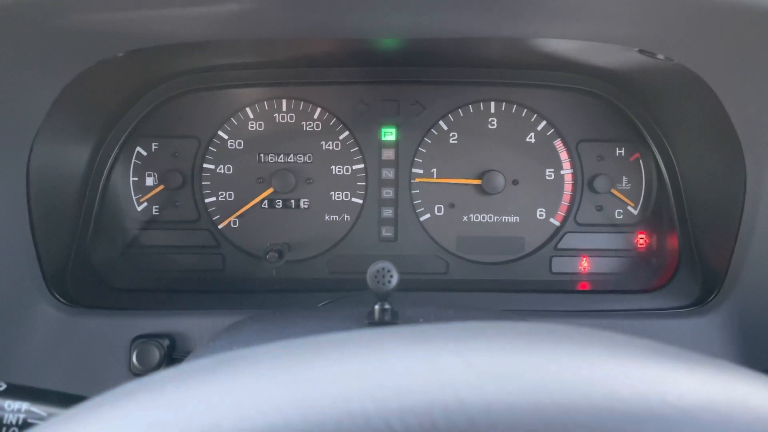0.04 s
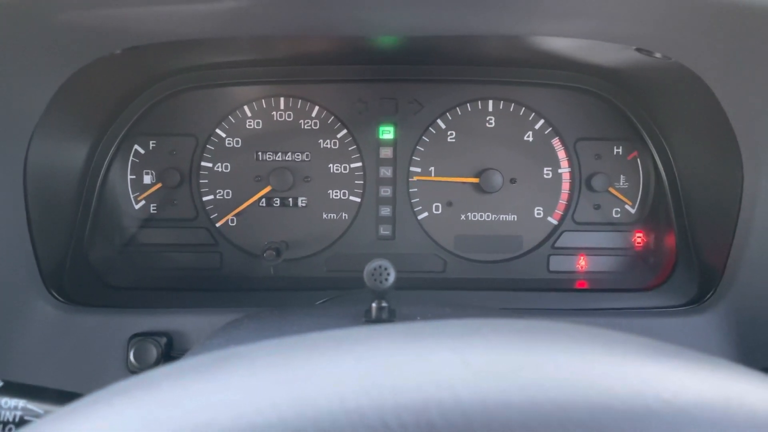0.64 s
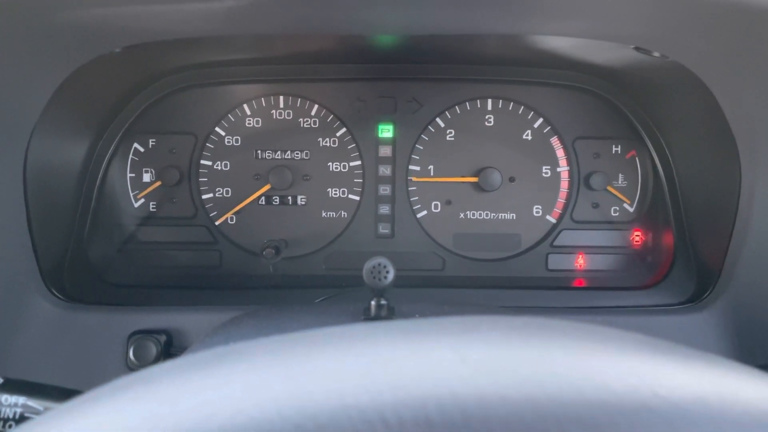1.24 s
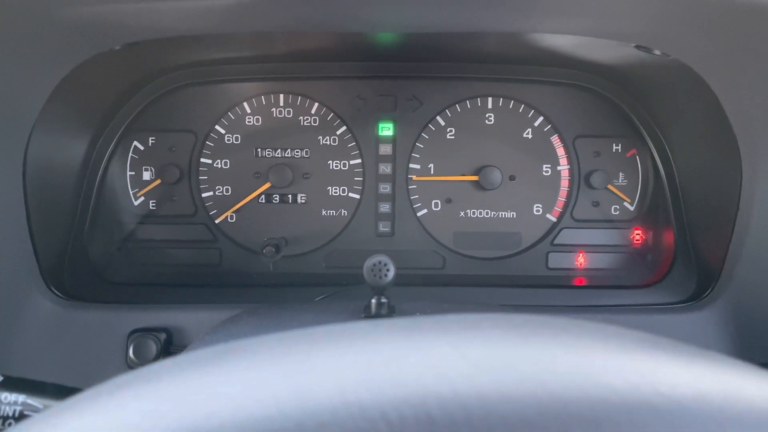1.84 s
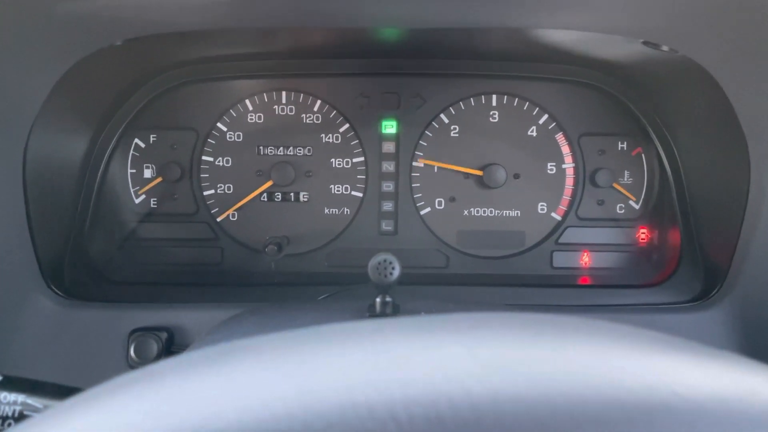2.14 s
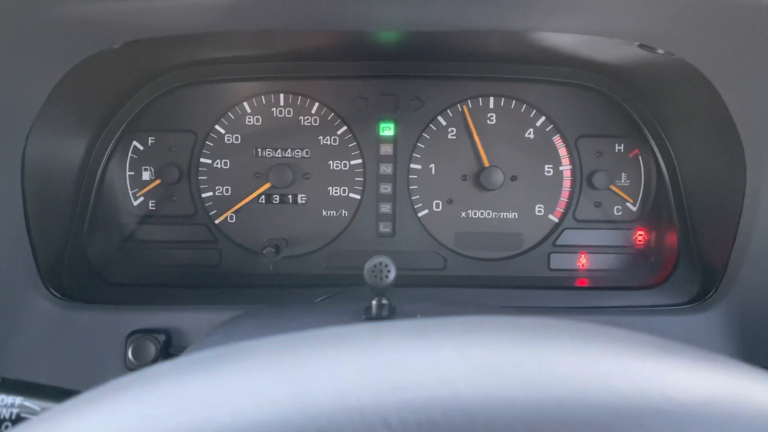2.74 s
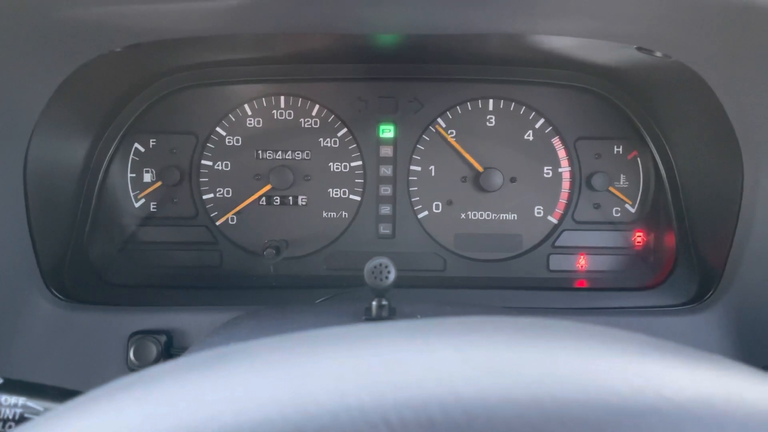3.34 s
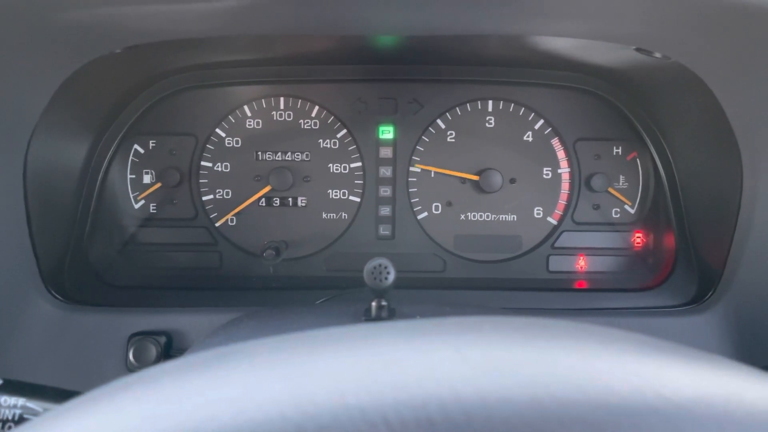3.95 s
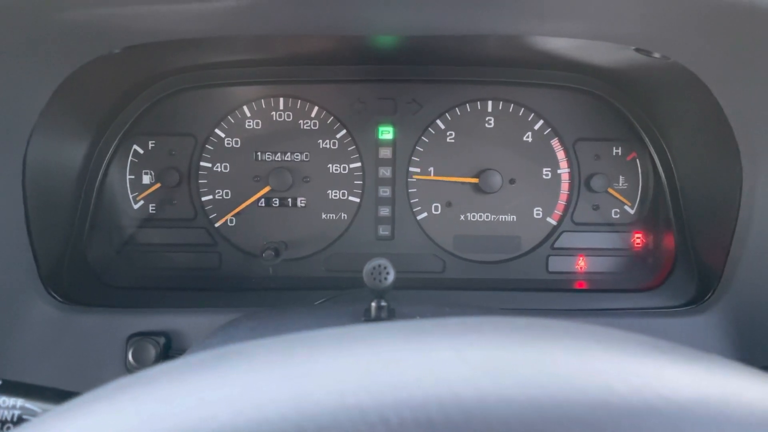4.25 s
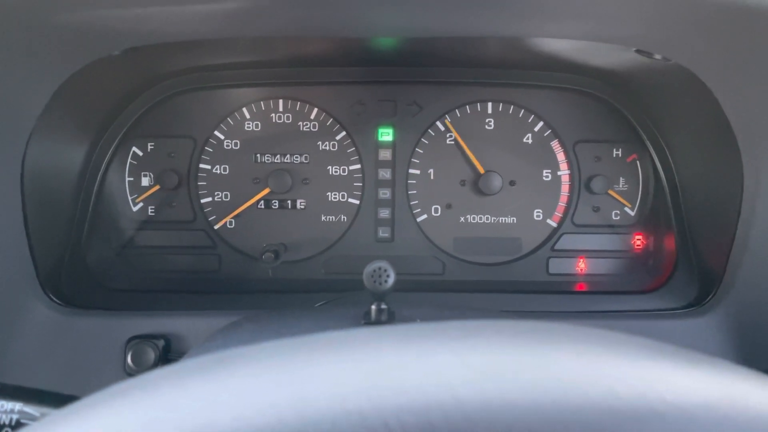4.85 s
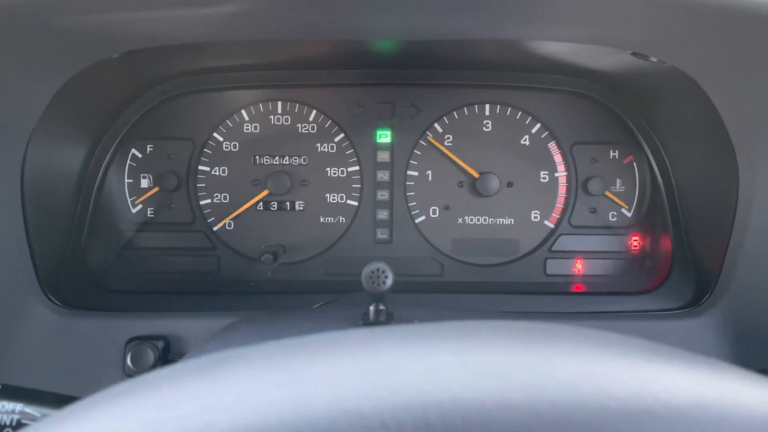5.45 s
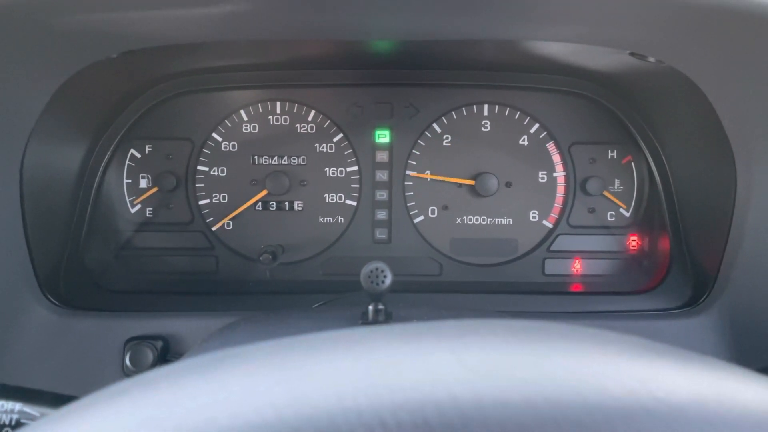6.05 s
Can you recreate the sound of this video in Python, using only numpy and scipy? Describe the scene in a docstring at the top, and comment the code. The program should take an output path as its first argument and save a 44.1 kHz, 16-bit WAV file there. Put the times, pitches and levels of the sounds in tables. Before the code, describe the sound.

A four-cylinder diesel engine idles with a low throb and light clatter, heard from the driver's seat of a stationary vehicle. After a slight nudge of the accelerator, it is revved twice, each time swelling into a booming, knocking roar and sinking back toward idle. A faint, airy turbo whistle climbs high and coasts down with each rev. Loose dashboard trim buzzes briefly now and then.

```python
"""Turbo diesel from the driver's seat

A four-cylinder engine, heard on a stereo microphone in the cabin, idles near 720 rpm, is nudged once,
then revved twice. Each firing pushes the cabin air (boom), shakes the body (roar), knocks the block
and makes the valves and injectors tick. The turbocharger whistles up under throttle and coasts slowly
down. The engine knocks hard as it pulls, and loose trim buzzes now and then."""
import sys
import numpy as np
from scipy import signal
from scipy.fft import rfft, irfft, next_fast_len
from scipy.io import wavfile

SR = 44100
rng = np.random.default_rng(int(sys.argv[2]) if len(sys.argv) > 2 else 0)


def materialize(psi):
    """Save the field psi as 16-bit PCM at rate SR to the path in sys.argv[1].

    A 1-D psi becomes a single channel; in a 2-D psi each row is a channel.
    """
    bounded = np.clip(np.atleast_2d(psi).T, -1, 1)
    quanta = np.round(bounded * 32767).astype(np.int16)
    wavfile.write(sys.argv[1], SR, quanta)


N = 272979
TIME = np.arange(N) / SR
FFT_SIZE = next_fast_len(N + SR // 4)
FREQ = np.maximum(np.arange(FFT_SIZE // 2 + 1) * SR / FFT_SIZE, 1)


# The firing pulse. Each row: multiple of the firing rate, level at idle in dB,
# dB more per doubling of speed, share of the pedal's extra boom.
PULSE_ORDERS = [(1, 0.5, 0.5, 1.2), (2, -8.5, 3.2, 0.57), (3, -15, 6.5, 1.07), (4, -7, -3.5, 0.7),
                (5, -22, 10.5, .3)]
# How the cabin air answers at the seat. Each row: frequency in Hz, gain in dB coasting, at full load.
CABIN_RESPONSE = [(24, -94, -48), (31, -51, -29), (39.5, -34, -22.5), (48.5, -22.5, -17.5),
                  (57.3, -14.5, -12), (67.9, -22, -11.5), (75.2, -13.5, -13.5), (82.8, -20.5, -16.5),
                  (94.5, -30, -18.5), (111, -26.5, -26.5), (159.6, -33.5, -36), (175.4, -29, -20.5),
                  (187, -27, -25), (203, -28, -35.5), (255, -38, -48)]
# Tones of crank, cam and belt drive. Each row: multiple of the firing rate, level at idle in dB,
# dB more per doubling of speed.
DRIVE_ORDERS = [(.75, -71.5, 23), (6, -45.5, -0.5), (7, -47.5, -5), (7.5, -59, 3.5), (8, -54, -0.5),
                (9, -55, -1), (9.75, -68, 6), (10, -55.5, -1.5), (13, -58, -5), (14, -65, -1), (16, -64, 0)]

def boom(cycles, firing_hz, octaves, load, swell_db):
    """Firing orders sweep through the cabin's resonances: a throb at idle, a hum at speed."""
    stroke_db = 0.55 * drift(11)  # no two power strokes push equally hard
    hz, *responses = np.transpose(CABIN_RESPONSE)
    hum = 0
    for order, idle_db, rise_db, share in PULSE_ORDERS:
        order_hz = order * firing_hz
        coasting_db, pulling_db = (np.interp(np.log(order_hz), np.log(hz), db) for db in responses)
        cabin_db = coasting_db + load * (pulling_db - coasting_db)
        dip_db = -10 * (1 - load) * bell(order_hz, centre_hz=51.8, width_hz=3.5)  # a brief dropout
        level_db = idle_db + rise_db * octaves + cabin_db + dip_db + share * swell_db + stroke_db
        # the cabin delays the orders unequally, so the thumps run together
        delay_rad = .6 + (order - 1) * 1.29 * octaves + .62 * (order - 3) ** 2
        hum += from_db(level_db) * np.cos(2 * np.pi * order * cycles - delay_rad)
    waver_db = np.interp(octaves, [0, 1], [.8, 4])  # the drive tones waver more at speed
    for order, idle_db, rise_db in DRIVE_ORDERS:
        offset_rad = max(order - 4, 0) * 2 * np.pi * rng.random() - .6
        level_db = idle_db + rise_db * octaves + waver_db * drift(14)
        hum += from_db(level_db) * np.cos(2 * np.pi * order * cycles + offset_rad)
    return np.sqrt(2) * hum * from_db([[.25], [-.35]])  # a touch louder on the left


# Three paths from the cylinders to the seat. Each row: frequency in Hz, relative level in dB.
ROAR_SPECTRUM = [(25, -29), (45, -5), (70, 8), (100, 5.5), (140, -1), (180, -2), (230, -6), (290, -8.5),
                 (430, -22.5), (900, -65.5)]
GROWL_SPECTRUM = [(180, -16.5), (250, 13.5), (310, 9), (380, 3), (450, 5.5), (560, 2), (800, -1),
                  (1300, -53)]
BLOCK_SPECTRUM = [(200, -27), (380, -0.5), (490, 1.5), (590, -2), (700, 1), (820, 1.5), (890, -5),
                  (1030, -10), (1130, -14.5), (1800, -65)]

def combustion(cycles, knocks, firing_hz, octaves, load):
    """Combustion roars through the body, growls at speed and knocks in the block."""
    blows = firings(cycles)
    roar = struck_part(blows, firing_hz, ROAR_SPECTRUM, rise_s=.013, decay_s=.04, repeat=.12, steady=1)
    growl = struck_part(blows, firing_hz, GROWL_SPECTRUM,
                        rise_s=.004, decay_s=.018, repeat=.2, steady=.3)
    repeat = np.interp(octaves, [0, 1], [.42, .2])  # the knock loosens at speed
    knock = struck_part(knocks, firing_hz, BLOCK_SPECTRUM,
                        rise_s=.012, decay_s=.032, repeat=repeat, steady=.084)
    every_fourth = firings(cycles / 4, early=.5425, scatter_db=2)  # one cylinder knocks harder
    odd_knock = cabin(sprays(every_fourth, firing_hz, rise_s=.00029, decay_s=.0037), BLOCK_SPECTRUM)
    mix = (from_db(-1.5 + 1.22 * octaves) * roar
           + from_db(-26.5 + 12.26 * octaves - 3.7 * load) * growl
           + from_db(-9 - .25 * octaves - 1.25 * load) * knock
           + from_db(-21 - 4.8 * octaves) * odd_knock)
    return from_db(-35.5 + 4 * octaves + .5 * octaves ** 2 + 4 * load) * mix


# The top of the engine, from behind the dashboard. Each row: frequency in Hz, relative level in dB.
CLATTER_SPECTRUM = [(600, -71.5), (1000, -7), (1200, 1), (1500, 5.5), (2150, -2), (2700, -5), (3200, -9),
                    (3700, -25), (6000, -37)]
TICK_SPECTRUM = [(2000, -8.5), (3300, 8), (4200, 6), (5200, 5), (6000, 2), (7500, -8), (9000, -2),
                 (10300, 3), (12000, -2.5), (13500, -10), (15500, -5.5)]
INJECTOR_SPECTRUM = [(3000, -14), (6000, -8), (8000, -8.5), (10300, 7.5), (12500, -5.5), (15500, 0)]

def valves_and_injectors(cycles, knocks, firing_hz, octaves, load):
    """Valves clatter and tick louder with speed and load; the injectors' fine tick holds its level."""
    taps = firings(cycles)
    clatter = struck_part(knocks, firing_hz, CLATTER_SPECTRUM,
                          rise_s=.008, decay_s=.023, repeat=.28, steady=.52)
    ticking = struck_part(taps, firing_hz, TICK_SPECTRUM,
                          rise_s=.013, decay_s=.021, repeat=.41, steady=.34)
    injectors = cabin(sprays(taps, firing_hz, rise_s=.003, decay_s=.009), INJECTOR_SPECTRUM)
    return (from_db(-53.5 + 4 * octaves + 2 * octaves ** 2 + 2.5 * load) * clatter
            + from_db(-65 + 1.46 * octaves + 3.5 * octaves ** 2 + 4 * load) * ticking
            + from_db(-70) * injectors)


# The bright crack of injection knock. Each row: frequency in Hz, relative level in dB.
CRACK_SPECTRUM = [(700, -30), (1200, -32), (1600, 9), (2200, 7.5), (2700, 2), (4300, -17.5), (7000, -18.5),
                  (12000, -50)]

def injection_rattle(cycles, firing_hz, throttle):
    """Near full speed under throttle, injection knock turns into sharp, uneven cracks, one a firing."""
    onset = np.clip((firing_hz - 67.7) / 5.8, 0, 1)
    clicks = firings(cycles, early=.37, scatter_db=4)
    cracks = sprays(clicks, firing_hz, rise_s=.0003, decay_s=.0035)
    return from_db(-45.5) * onset * throttle * cabin(cracks, CRACK_SPECTRUM)


# Firings that knock hard as the engine pulls. Each row: start in seconds, clonk in dB, crack in dB.
HARSH_FIRINGS = [(2.203, -23, -41), (2.287, -40, -43), (2.341, -37, -49), (2.413, -25, -41),
                 (2.482, -32, -31), (2.531, -27, -44), (2.539, -34, -38), (2.612, -23, -38),
                 (4.301, -31, -42), (4.322, -31, -48), (4.35, -27.5, -46), (4.503, -31, -39),
                 (4.673, -41, -40)]

def hard_knocks():
    """Single harsh firings: a clonk in the block and a bright crack from the covers."""
    starts, clonk_db, crack_db = np.transpose(HARSH_FIRINGS)
    clonk = jolts(zip(starts, clonk_db), rise_s=.00046, decay_s=.0041) * cabin_noise(BLOCK_SPECTRUM)
    crack = jolts(zip(starts, crack_db), rise_s=.00059, decay_s=.004) * cabin_noise(CRACK_SPECTRUM)
    return clonk + crack


# The turbo shaft's speed, up ahead in the engine bay. Each row: time in seconds, whistle pitch in Hz.
TURBO_PITCH = [(0, 4430), (.55, 3780), (1.9, 3200), (2.14, 4400), (2.27, 5950), (2.35, 6900), (2.46, 9400),
               (2.59, 11350), (2.66, 11300), (2.8, 10400), (3.03, 8700), (3.33, 7150), (3.6, 5850),
               (4.15, 4350), (4.29, 4800), (4.4, 5400), (4.46, 6050), (4.52, 6400), (4.57, 7150),
               (4.66, 8650), (4.72, 9950), (4.76, 10400), (5.02, 8750), (5.35, 7150), (5.7, 5600),
               (6.19, 4450)]
# Broad intake resonances, where the whistle flares or fades. Each row: centre in Hz, width in Hz,
# lift in dB off the throttle, lift in dB at full throttle.
INTAKE_RESONANCES = [(4050, 500, 3.5, 0), (4650, 600, 0, 8.5), (5400, 600, 0, -3), (6300, 750, -1.5, 9),
                     (7200, 800, -2.5, 0), (8100, 860, 1, 3), (10050, 1300, 4, 15), (11200, 1100, 9, 4.5)]
# Air rushing into the intake while the pedal is down. Each row: frequency in Hz, relative level in dB.
INTAKE_SPECTRUM = [(2000, -38), (4000, -9.5), (6300, 4), (8000, -19), (10000, 7), (13000, 4), (15000, 3.5)]
# Narrow duct modes that sing as the whistle passes. Each row: centre in Hz, width in Hz, lift in dB.
DUCT_MODES = [(6600, 90, 7.5), (6200, 65, 2), (9500, 59, 7), (9670, 170, 6), (9600, 98, 2.5)]

def turbo(throttle):
    """Exhaust spins the shaft up and it coasts down, whistling in patches over the intake's rush."""
    hz, = in_time(TURBO_PITCH)
    octaves = np.log2(hz / 4400)
    level_db = -75 + 5.5 * octaves + 7 * throttle
    level_db -= .04 * np.maximum(3780 - hz, 0)  # the whistle dies away at low pitch
    for centre, width, off_db, on_db in INTAKE_RESONANCES:
        level_db += (off_db + throttle * (on_db - off_db)) * bell(hz, centre, width)
    breath = np.clip(.3 + 1.5 * octaves, .1, .85)
    tone = np.sqrt(1 - breath) * whistle(hz, width_hz=110) + np.sqrt(breath) * whistle(hz, width_hz=420)
    flutter_db = 2.2 * drift(40)
    rush = from_db(-60) * throttle * cabin_noise(INTAKE_SPECTRUM)
    duct_db = sum(lift_db * bell(FREQ, centre, width) for centre, width, lift_db in DUCT_MODES)
    return filtered(from_db(level_db + flutter_db) * tone + rush, from_db(duct_db))


def whistle(hz, width_hz):
    """An airy tone: turbulence smears it into a narrow band."""
    phase = 2 * np.pi * np.cumsum(hz) / SR
    pair = [drift(width_hz) * np.cos(phase) + drift(width_hz) * np.sin(phase) for _ in range(2)]
    return cabin(np.array(pair), [(3000, .003), (12000, .013)])  # an all but flat path


# Loose trim, close to the microphone. Each row: start in seconds, level in dB.
TRIM_BUMPS = [(.637, -32), (.652, -36), (2.8348, -28), (4.626, -39), (4.715, -25)]
# Its dull buzz. Each row: frequency in Hz, relative level in dB.
TRIM_SPECTRUM = [(150, -12), (350, 4), (800, 0), (2300, -13), (4000, -29), (12000, -48)]

def dashboard_trim():
    """Loose trim in the dashboard bumps and buzzes briefly."""
    return jolts(TRIM_BUMPS, rise_s=.0015, decay_s=.0064) * cabin_noise(TRIM_SPECTRUM)


# Ringing panels and engine covers. Each row: centre in Hz, width in Hz, lift in dB.
PANEL_MODES = [(204, 16, 4), (348, 110, 4.5), (647, 18, 8.5), (1029, 25.4, 11), (1430, 33, 6.5),
               (2152, 29, 8.5), (3340, 40, 8), (4310, 400, 3), (6000, 71, 0), (7100, 1100, 9),
               (10450, 110, -6)]
# The microphone's two ports at the driver's seat. Each row: frequency in Hz, likeness from 0 to 1,
# phase lead of the right in radians, left minus right in dB.
MIC_PORTS = [(60, .99, 0, .6), (130, .94, 0, -1.6), (280, .74, -.1, -2), (550, .42, .4, 1.2),
             (850, .47, 1.0, -1), (1250, .48, 2.1, -2), (1800, .42, 1.6, 0), (2200, .28, 0, .7),
             (2900, .48, -1.9, 1.3), (3700, .54, -.3, 2), (5300, .54, -.3, 1.8), (6900, .62, 1.2, .3),
             (7600, .92, 2.7, 0), (8200, .98, 3.1, 0), (9000, .92, 3.6, 0), (10400, .85, 5.5, 0),
             (12400, .9, 6.5, 0), (14000, .96, 9.3, 0), (16000, .98, 9.4, 0)]

def cabin(pair, spectrum):
    """Colour two unrelated signals by a path and the panels, and share them between the ports; rms 1."""
    panel_db = sum(lift_db * bell(FREQ, centre, width) for centre, width, lift_db in PANEL_MODES)
    path_db, = in_frequency(spectrum)
    common, apart = rfft(pair, FFT_SIZE) * from_db(path_db + panel_db)
    alike, lead_rad, pan_db = in_frequency(MIC_PORTS)
    sides = np.array([[1], [-1]])
    ports = np.sqrt(1 + alike) * common + sides * np.sqrt(1 - alike) * apart
    placement = np.exp(-.5j * sides * lead_rad) * from_db(sides * pan_db / 2)
    return rms_one(irfft(ports * placement, FFT_SIZE)[:, :N])


def cabin_noise(spectrum):
    """Steady noise as it reaches the seat along one path."""
    return cabin(rng.standard_normal((2, N)), spectrum)


# The four uneven cylinders, in firing order. Each entry: relative strength in dB.
CYLINDER_BALANCE = [0.71, 0.8, -0.85, 0.53]

def firings(cycles, early=.25, scatter_db=1.62):
    """One click a cycle, `early` of a cycle before the pressure peak; no two are equally strong."""
    at = np.flatnonzero(np.diff(np.floor(cycles + early)))
    clicks = np.zeros(N)
    clicks[at] = from_db(np.resize(CYLINDER_BALANCE, len(at)) + scatter_db * rng.standard_normal(len(at)))
    return clicks


def struck_part(clicks, firing_hz, spectrum, rise_s, decay_s, repeat, steady):
    """Each firing sets off the same dense ring (power share `repeat`) plus loose, changing impacts."""
    age = TIME[:SR // 6]
    ring = rng.standard_normal((2, len(age))) * np.exp(-age / decay_s) * (1 - np.exp(-age / rise_s))
    rings = rms_one(signal.fftconvolve([clicks / np.sqrt(firing_hz)], ring, axes=1)[:, :N])
    loose = sprays(clicks, firing_hz, rise_s, decay_s / 2, steady)
    return cabin(np.sqrt(repeat) * rings + np.sqrt(1 - repeat) * loose, spectrum)


def sprays(clicks, firing_hz, rise_s, decay_s, steady=0):
    """Each click starts a spray of tiny impacts; `steady` is the power share of an even rush."""
    power = lag(lag(clicks ** 2 * SR / firing_hz, rise_s), decay_s)
    return np.sqrt(steady + (1 - steady) * power) * rng.standard_normal((2, N))


def jolts(rows, rise_s, decay_s):
    """The envelope of brief impacts, from rows of start in seconds and level in dB."""
    envelope = np.zeros(N)
    for start, db in rows:
        age = np.maximum(TIME - start, 0)
        envelope += from_db(db) * (1 - np.exp(-age / rise_s)) * np.exp(-np.minimum(age / decay_s, 20))
    return envelope


def press(down_s, up_s):
    """One press of the accelerator, 0-1: it ramps in over 55 ms, holds and ramps out over 12 ms."""
    return np.clip((TIME - down_s) / .055, 0, 1) * np.clip((up_s - TIME) / .012 + .5, 0, 1)


def drift(rate_hz):
    """A random wander of spread 1, up to about the given rate."""
    step = 16  # samples between points
    count = next_fast_len(N // step + 2)
    hz = np.arange(count // 2 + 1) * SR / step / count
    slow = irfft(rfft(rng.standard_normal(count)) / (1 + (hz / rate_hz) ** 4), count)
    return np.interp(np.arange(N) / step, np.arange(count), rms_one(slow))


def lag(x, seconds):
    """One-pole smoothing: a click becomes a decaying tail of the same area."""
    pole = np.exp(-1 / (seconds * SR))
    return signal.lfilter([1 - pole], [1, -pole], x + 1e-18)


def bell(hz, centre_hz, width_hz):
    """A resonance curve: 1 at its centre, a half at its edges."""
    return 1 / (1 + (2 * (hz - centre_hz) / width_hz) ** 2)


def filtered(pair, gain):
    """Apply a gain at every frequency to both channels."""
    return irfft(rfft(pair, FFT_SIZE) * gain, FFT_SIZE)[:, :N]


def in_time(rows):
    """Each column of a curve table at every sample."""
    seconds, *columns = np.transpose(rows)
    return [np.interp(TIME, seconds, column) for column in columns]


def in_frequency(rows):
    """Each column of a spectrum table at every frequency."""
    hz, *columns = np.transpose(rows)
    return [np.interp(np.log(FREQ), np.log(hz), column) for column in columns]


def from_db(db):
    """Decibels to gain."""
    return 10 ** (np.asarray(db) / 20)


def rms_one(x):
    """Scale to rms 1."""
    return x / np.sqrt(np.mean(x ** 2) + 1e-20)


# Engine speed. Each row: time in seconds, firings per second (two to a revolution).
FIRING_RATE = [(0.0, 22.91), (0.28, 24.1), (0.48, 28.23), (0.88, 24.05), (1.9, 24.02), (2.0, 36.71),
               (2.3, 60.48), (2.55, 85.87), (2.66, 87.84), (2.87, 75.19), (3.2, 57.32), (3.45, 44.81),
               (3.95, 26.38), (4.15, 23.55), (4.3, 36.38), (4.55, 61.01), (4.77, 81.59), (4.9, 72.51),
               (5.2, 56.9), (5.45, 45.26), (5.85, 29.73), (6.19, 23.09)]
# The accelerator, one nudge and two revs. Each row: press and release in seconds,
# depth from 0 to 1, extra boom in dB.
PEDAL_PRESSES = [(0.35, 0.843, 0.17, 5), (1.874, 2.604, 1, -1.5), (4.184, 4.732, 1.0, -2)]

def scene():
    """At the driver's seat: the crank times the firings; speed and pedal set how loud they are."""
    firing_hz, = in_time(FIRING_RATE)
    cycles = np.cumsum(firing_hz) / SR - .47  # one cycle a firing
    octaves = np.log2(firing_hz / 24)  # doublings of speed above idle
    throttle = sum(depth * press(down, up) for down, up, depth, _ in PEDAL_PRESSES)
    load = np.maximum(throttle, lag(throttle, seconds=.053))  # lingers after the pedal lifts
    swell_db = sum(boom_db * press(down, up) for down, up, _, boom_db in PEDAL_PRESSES)
    knocks = firings(cycles)  # shared by the block's knock and the clatter
    return (boom(cycles, firing_hz, octaves, load, swell_db)
            + combustion(cycles, knocks, firing_hz, octaves, load)
            + valves_and_injectors(cycles, knocks, firing_hz, octaves, load)
            + injection_rattle(cycles, firing_hz, throttle)
            + hard_knocks() + turbo(throttle) + dashboard_trim())


def record(dry):
    """The ends fade briefly and the top is cut steeply."""
    fade_s, cutoff_hz = .008, 15750
    faded = dry * np.clip(np.minimum(TIME, TIME[::-1]) / fade_s, 0, 1)
    return filtered(faded, 1 / np.sqrt(1 + (FREQ / cutoff_hz) ** 400))


dry = scene()
out = record(dry)
materialize(out)
```